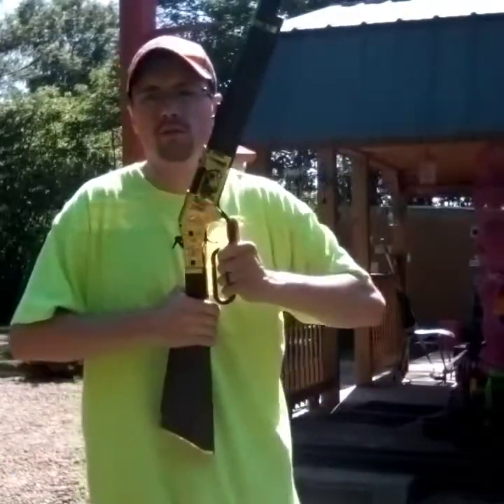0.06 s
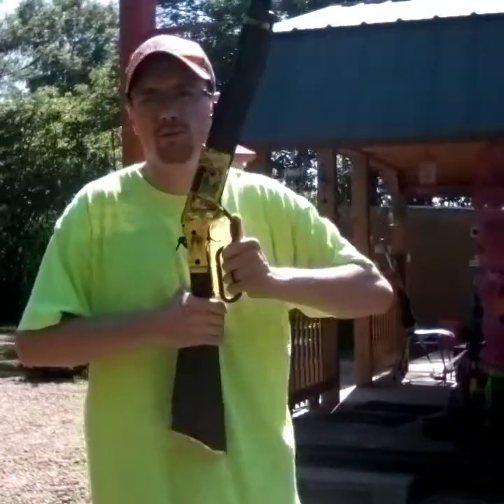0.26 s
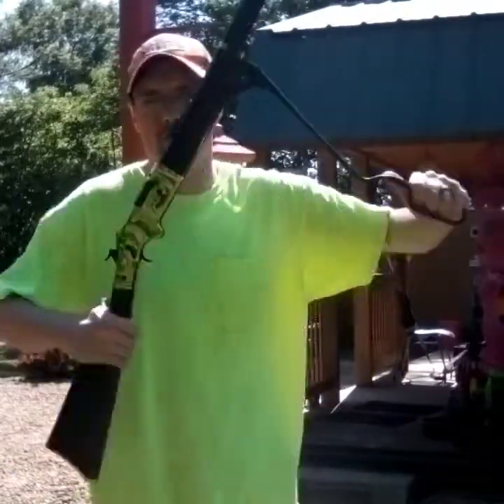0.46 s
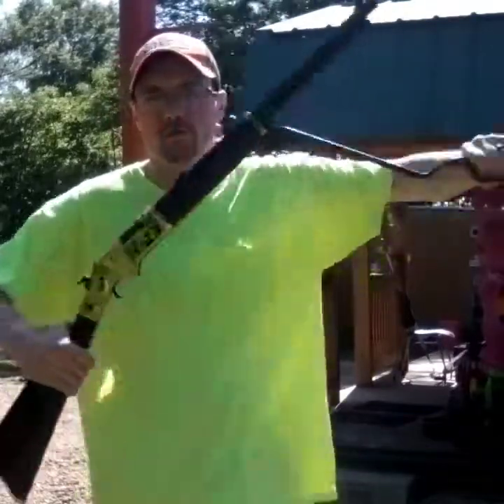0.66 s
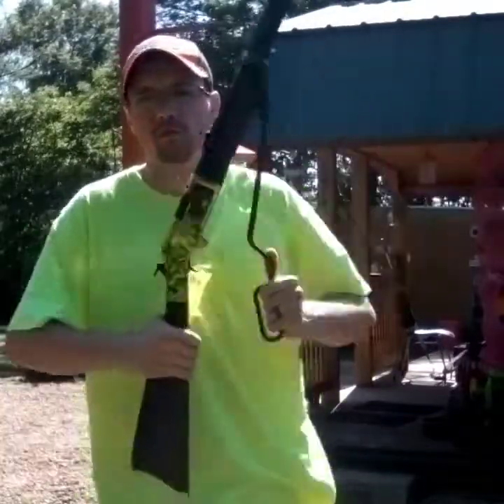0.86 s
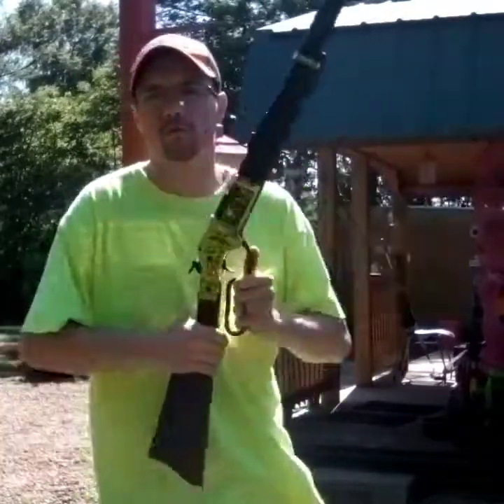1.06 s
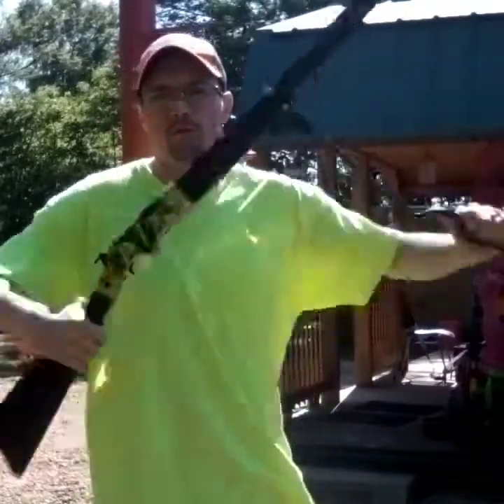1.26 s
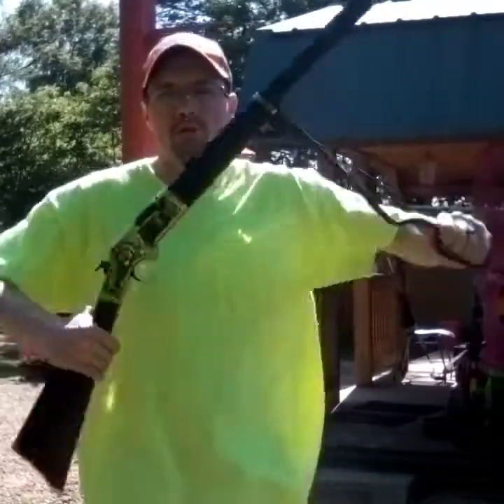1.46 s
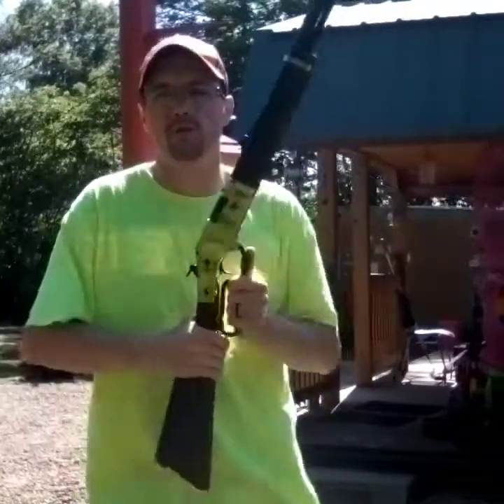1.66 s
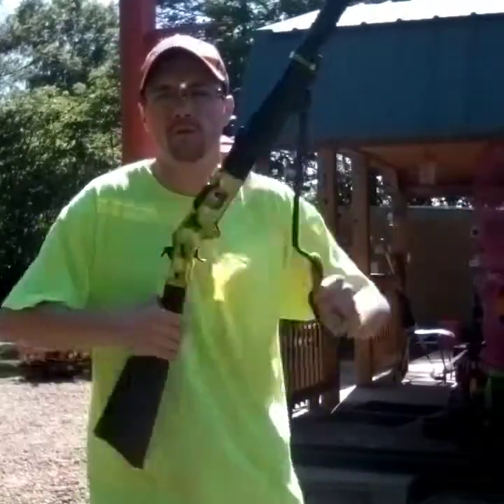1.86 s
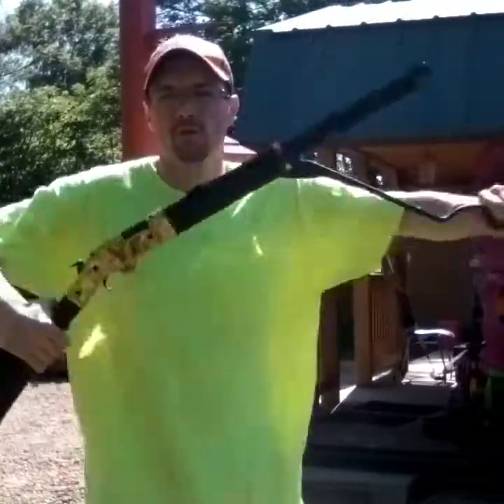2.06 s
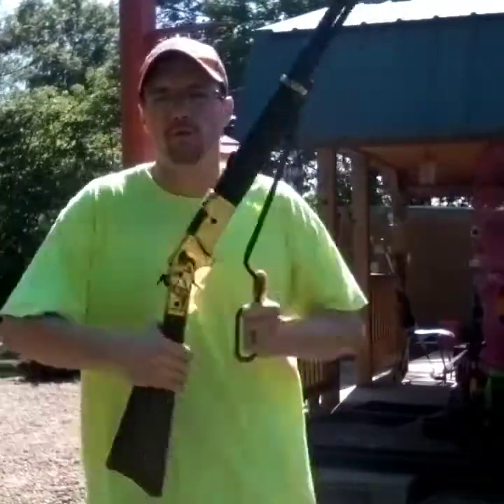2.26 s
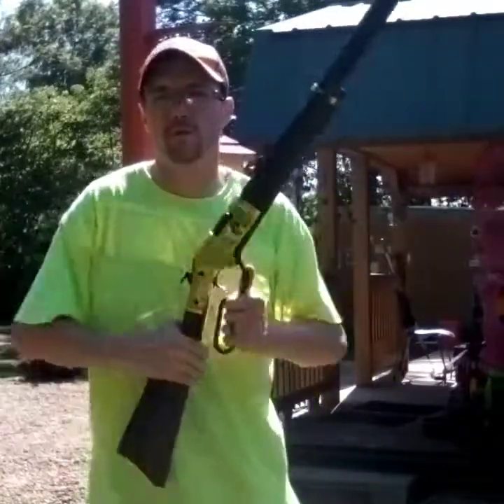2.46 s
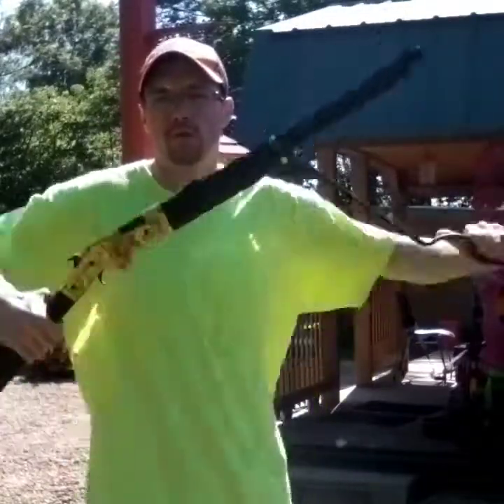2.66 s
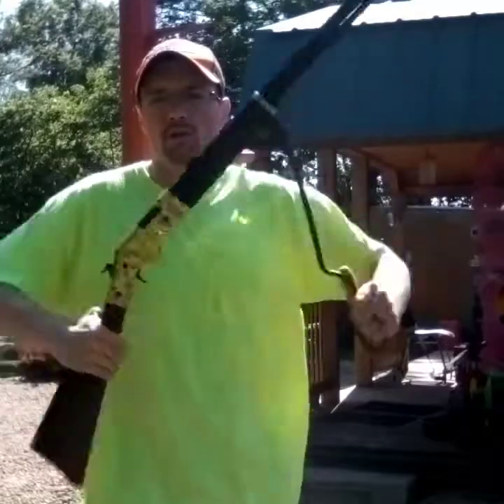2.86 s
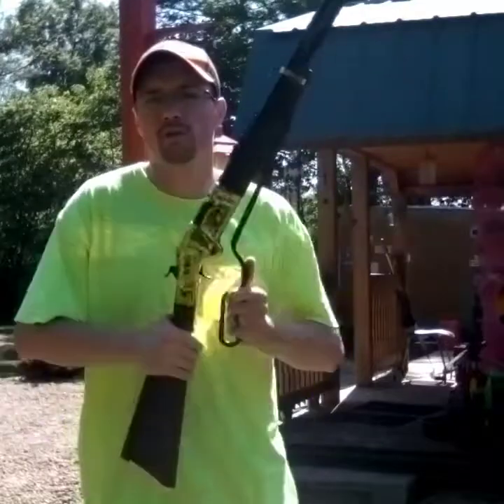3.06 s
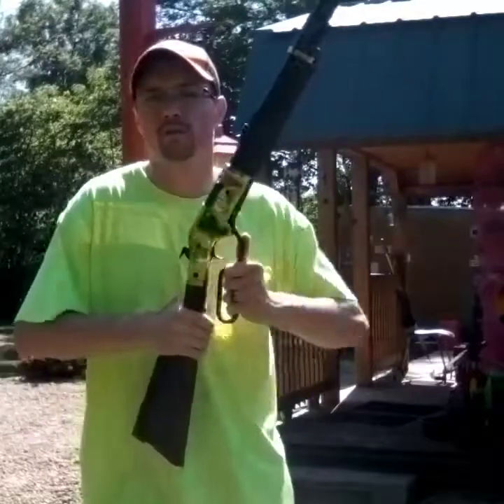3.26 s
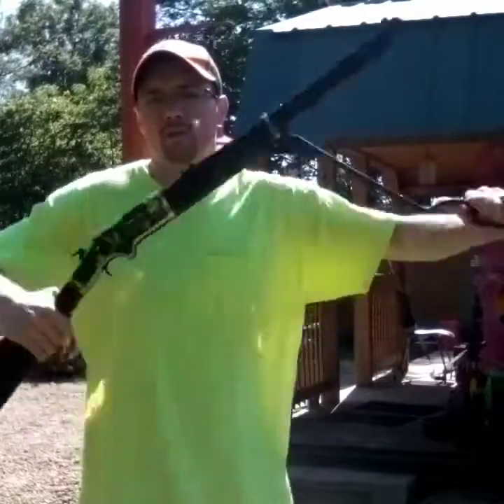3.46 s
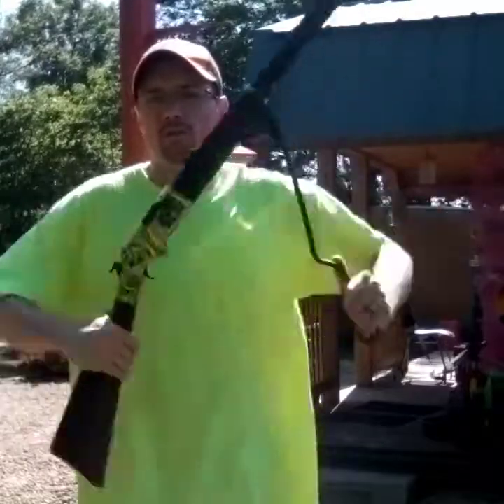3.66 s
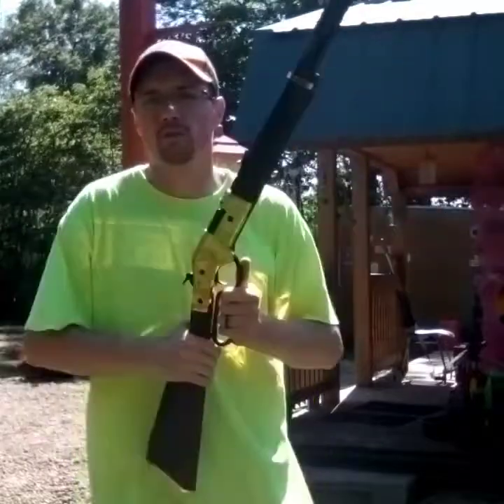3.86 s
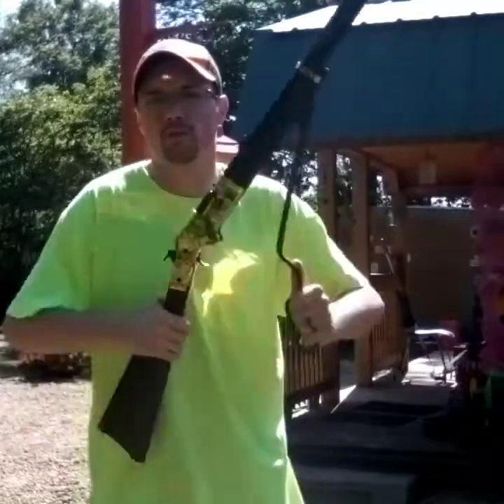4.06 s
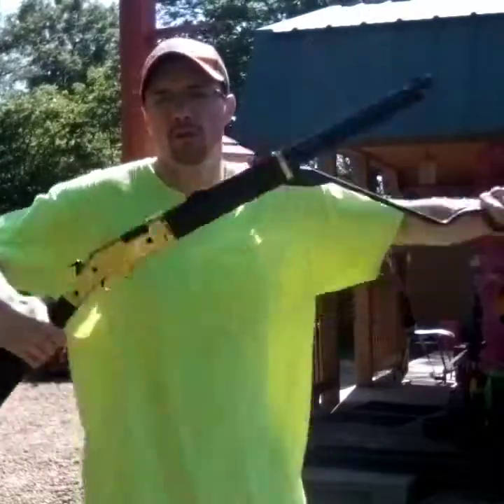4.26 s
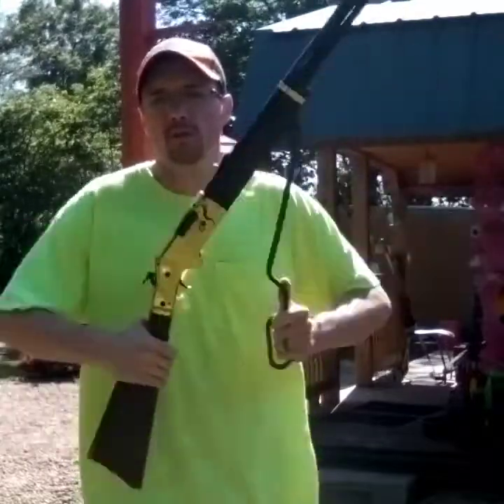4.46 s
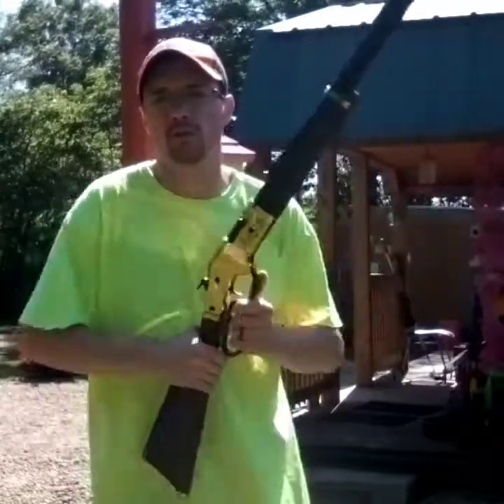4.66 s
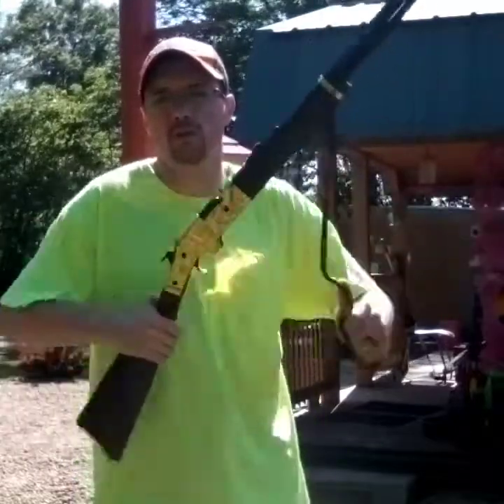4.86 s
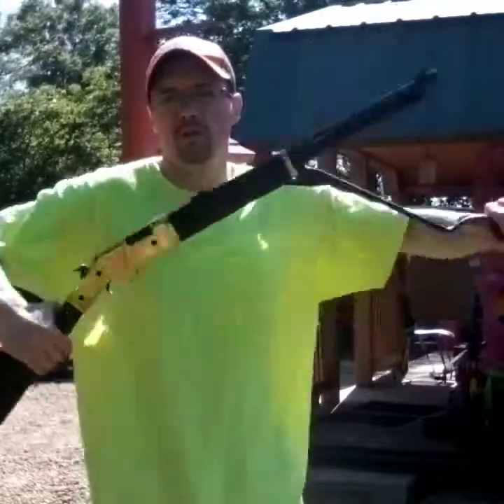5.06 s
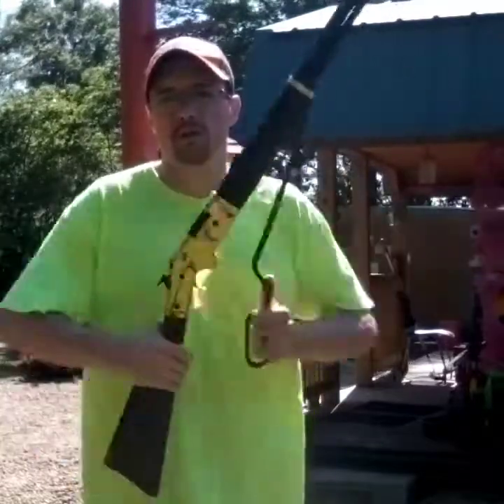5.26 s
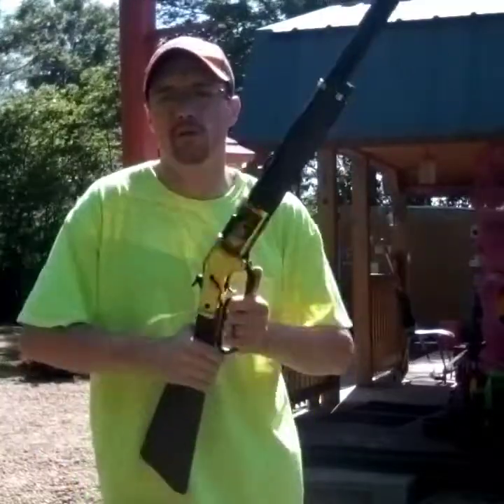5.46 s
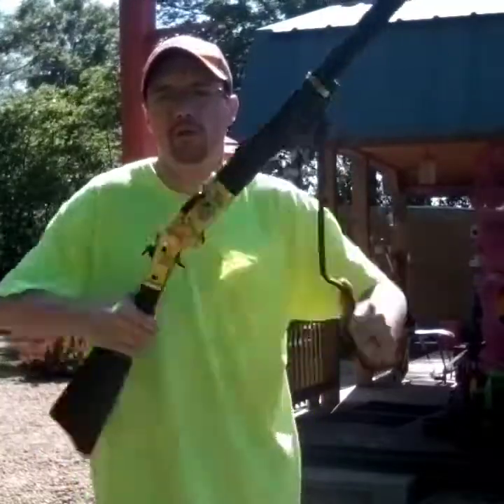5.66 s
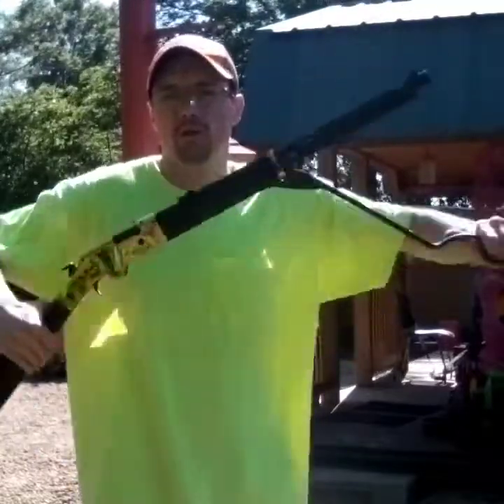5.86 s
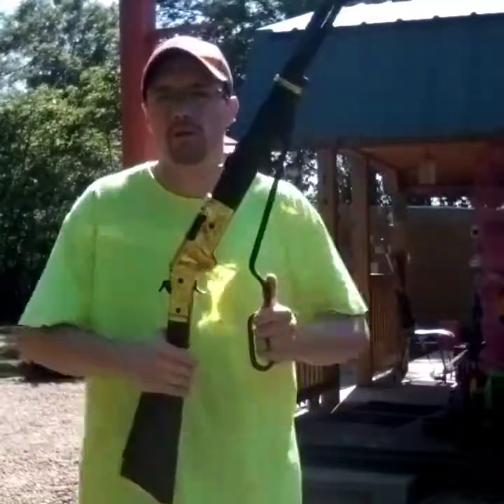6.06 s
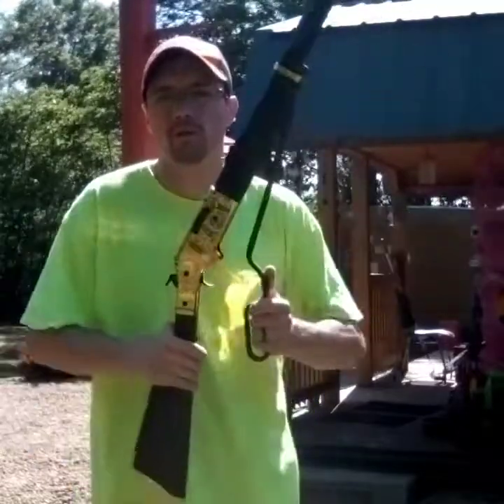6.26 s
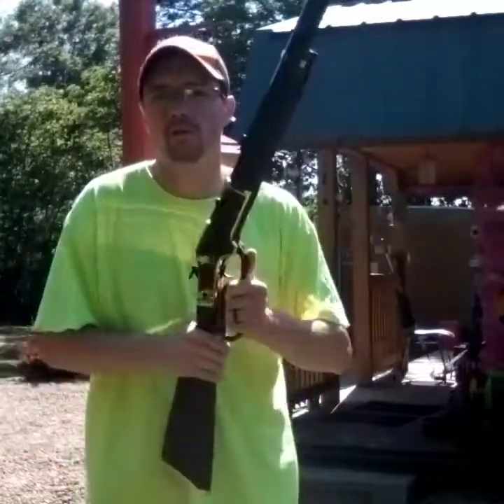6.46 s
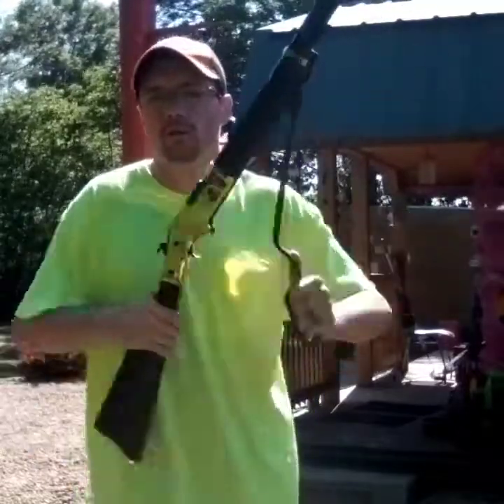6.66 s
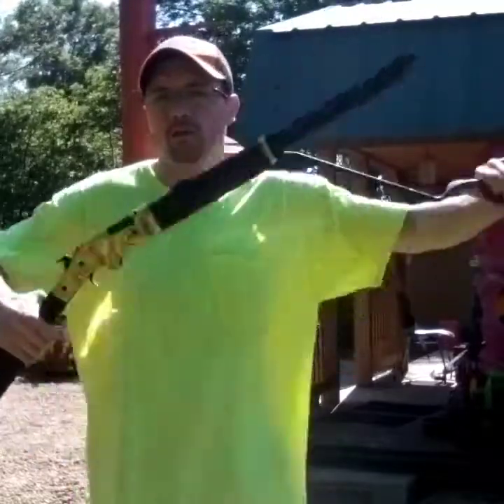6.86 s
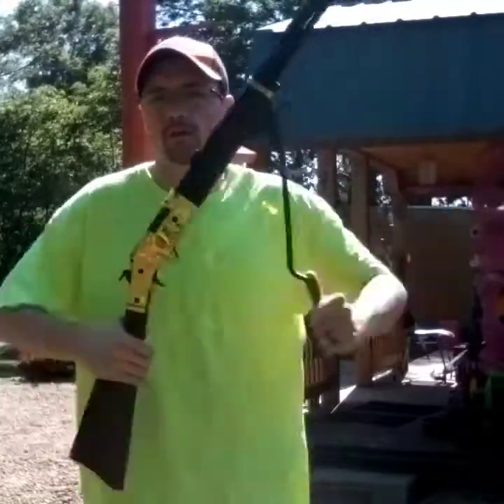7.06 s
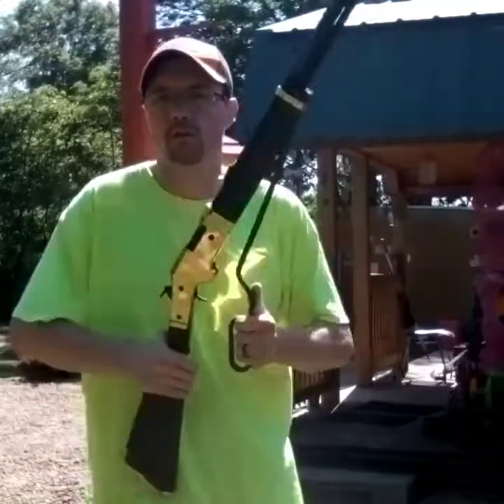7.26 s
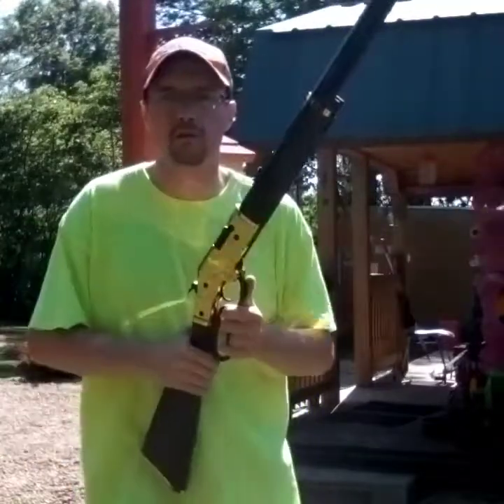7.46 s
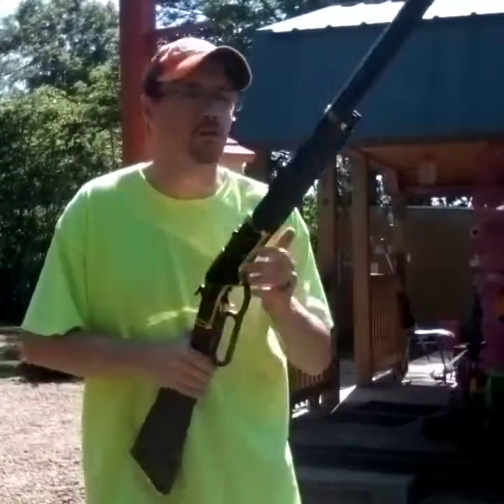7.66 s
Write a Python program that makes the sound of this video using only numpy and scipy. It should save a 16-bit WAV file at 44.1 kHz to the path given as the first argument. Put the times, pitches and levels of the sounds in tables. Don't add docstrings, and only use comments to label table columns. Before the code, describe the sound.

After a thin dry pivot squeak, a rifle's pump lever is worked by hand at a steady pace, about every three quarters of a second. Light clicks, ticks and scrapes lead to each hard, clipped-sounding metal slam, nine in all, some softer or doubled. Outdoors, heard close, with short yard echoes, low engine and fan hum, faint traffic and a far vehicle gradually getting louder.

```python
import sys
import numpy as np
from scipy import signal
from scipy.fft import rfft, irfft, next_fast_len
from scipy.io import wavfile
from scipy.ndimage import uniform_filter1d, minimum_filter1d, map_coordinates

SR = 44100
rng = np.random.default_rng(int(sys.argv[2]) if len(sys.argv) > 2 else 0)


def materialize(psi):
    bounded = np.clip(np.atleast_2d(psi).T, -1, 1)
    quanta = np.round(bounded * 32767).astype(np.int16)
    wavfile.write(sys.argv[1], SR, quanta)


def invert_db(level):
    return 10 ** (np.asarray(level, dtype=float) / 20)


N = 340011

# blow in seconds, level in dB, rattle length in s, lead of the catch in s, catch in dB.
SLAMS = [
    (0.993, -2, 0.0048, 0.0057, -9),
    (1.705, -2.5, 0.0054, 0.006, -13.5),
    (2.3758, -6.5, 0.0014, 0.0056, -16),
    (3.1678, -8, 0.0042, 0.0058, -9),
    (3.8951, -5.5, 0.0049, 0.0079, -7.5),
    (4.6467, -3.5, 0.0063, 0.006, -18),
    (5.458, -2.5, .0055, .0056, -8),
    (6.42, -4, 0.0071, 0.0086, -13),
    (7.3905, -7.5, 0.003, 0.0014, -5.5),
]
# start in seconds, peak in dB, rebound after in s, rebound in dB, drag in dB.
STOPS = [(0.628, -25.5, 0.012, -29.5, -51), (1.384, -18.5, 0.01, -30, -51), (2.08, -20.5, 0.013, -29, -51),
         (2.7501, -18.5, 0.0165, -31.5, -50), (3.5532, -19, 0.012, -26.5, -46.5),
         (4.29, -19, 0.013, -24.5, -49), (5.0705, -19, .0372, -34, -55), (5.8618, -21, 0.016, -28.5, -59),
         (6.9012, -27, 0.033, -33, -51.5)]
# start in seconds, peak in dB, tube ring in dB, drag in dB.
RETURNS = [(0.897, -30, -9.5, -62.5), (1.614, -30, -5.5, -53), (2.291, -25, -10, -53),
           (2.9677, -24.5, -11, -56), (3.762, -24, -10, -57), (4.5188, -25.5, -6, -55),
           (5.2924, -24, -10, -52.5), (6.0767, -25, -10, -56), (7.144, -28, -7.5, -49.5)]
# frequency in Hz, level in dB per Hz.
GRIT = [(590, -45), (1000, -15.5), (1660, -6), (2790, -10), (3980, -3), (4540, -5.5), (6120, -2),
        (8900, -31), (14000, -44.5)]
# time in seconds, pitch in Hz, level in dB.
PASSER = [
    (0, 74, -64),
    (2.5, 77, -63),
    (4, 81.7, -59.5),
    (6, 83.5, -53),
    (6.3, 73.9, -50.5),
    (7.7, 74.1, -48),
]


def unit(x):
    return x / np.sqrt(np.mean(x ** 2) + 1e-20)


def along(points, hz):
    f, v = np.transpose(points)
    return np.interp(np.log(hz + 1), np.log(f + 1), v)


def curves(rows):
    s, *cols = np.transpose(rows)
    return [np.interp(np.arange(N) / SR, s, c) for c in cols]


def wobble(rate):
    knots = rng.standard_normal(int(N * rate / SR) + 4)
    return map_coordinates(knots, [np.arange(N) * rate / SR])


def causal(gain, size=2048):
    cep = irfft(np.log(gain(np.fft.rfftfreq(size, 1 / SR)) + 1e-6), size)
    cep[1:size // 2] *= 2
    cep[size // 2 + 1:] = 0
    h = irfft(np.exp(rfft(cep)), size)
    return h / np.linalg.norm(h)


def add(track, s, sound):
    part = track[round(s * SR):][:len(sound)]
    part += sound[:len(part)]


def split(x, edge_hz):
    m = next_fast_len(N)
    low = irfft(rfft(x, m) / (1 + (np.fft.rfftfreq(m, 1 / SR) / edge_hz) ** 6), m)[..., :N]
    return low, x - low


def rush(spectrum, patchy_db):
    z = signal.stft(rng.standard_normal(N + 512), nperseg=512)[2]
    field = uniform_filter1d(rng.standard_normal(z.shape), size=4, axis=0)
    field = uniform_filter1d(field, size=9, axis=1)
    x = signal.istft(z * invert_db(patchy_db * unit(field)), nperseg=512)[1][:N]
    m = next_fast_len(N + 8192)
    colour = invert_db(along(spectrum, np.fft.rfftfreq(m, 1 / SR)))
    return unit(irfft(rfft(x, m) * colour, m)[:N])


def grainy(spectrum, rate, spread_db):
    grains = rng.standard_normal(N) * invert_db(spread_db * wobble(rate))
    return unit(signal.fftconvolve(grains, causal(lambda f: invert_db(along(spectrum, f))))[:N])


def background():
    # time in seconds, strength in dB.
    gusts = [(0, -1.5), (.9, 0), (2.0, 1), (2.9, -1), (4.0, 1.9), (5.5, 1.5), (6.4, 2.3), (7.0, 4),
             (7.71, 1.2)]
    # frequency in Hz, level in dB per Hz.
    rumble_colour = [(14, -48.5), (25, -31.5), (40, -18), (60, -13.5), (100, -1), (140, -3.5), (200, -12),
                     (250, -22.5), (350, -27.5), (480, -49.5), (800, -110)]
    # frequency in Hz, level in dB per Hz.
    traffic_colour = [(190, -61.5), (330, -15), (365, -21.5), (510, -0.5), (563, 2.5), (789, -11),
                      (870, -28.5), (1000, -27.5), (1300, -42.5), (2200, -120)]
    # frequency in Hz, level in dB per Hz.
    hiss_colour = [(530, -40), (900, -7.5), (968, -4), (1710, -9.5), (1930, -9.5), (3580, -13.5),
                   (4040, -15.5), (4570, -15), (5480, -10), (9220, -35), (15000, -38), (16300, -33.5)]
    breeze_db, = curves(gusts)
    near_db = curves(PASSER)[1]
    vehicle_share, breeze_share = 0.3, 0.36
    rumble_db = -48 + vehicle_share * (near_db - near_db.mean()) + 0.84 * wobble(0.71)
    rumble = invert_db(rumble_db) * rush(rumble_colour, patchy_db=-1.0)
    traffic_db = -52 + breeze_share * breeze_db + 0.29 * wobble(6.4) + 0.4 * wobble(0.96)
    traffic = invert_db(traffic_db) * rush(traffic_colour, patchy_db=3.0)
    return rumble + traffic + invert_db(-64.5 + breeze_db) * rush(hiss_colour, patchy_db=2.4)


def engines():
    # time in seconds, pitch in Hz, level in dB.
    drone = [(0.0, 102.73, -49.0), (0.77, 101.51, -44.6), (1.54, 101.49, -40.2), (2.31, 101.62, -41.8),
             (3.08, 101.81, -50.6), (3.85, 101.32, -53.8), (4.62, 99.96, -46.7), (5.39, 99.45, -43.6),
             (6.16, 99.65, -39.7), (6.93, 100.08, -41.2), (7.7, 100.09, -44.8)]
    # multiple of the pitch, level in dB.
    orders = [(.5, -59), (1.25, -59), (1.5, -61), (1.75, -60), (2, -61)]
    # time in seconds, pitch in Hz, level in dB.
    fan = [(0.0, 108.72, -54.5), (1.54, 108.77, -50.0), (3.08, 108.7, -50.1), (4.62, 108.76, -50.8),
           (6.16, 108.77, -48.9), (7.7, 108.84, -46.5)]
    # pitch in Hz, level in dB.
    hum_hz, hum_db = (58.2, -53.5)
    turn = lambda hz: 2 * np.pi * np.cumsum(hz) / SR
    hz, db = curves(drone)
    out = invert_db(db + 4.5 + 0.7 * wobble(10)) * np.cos(turn(hz))
    for multiple, order_db in orders:
        out += invert_db(order_db + 3 * wobble(1.5)) * np.cos(multiple * turn(hz) + 1.5 * wobble(3))
    hz, db = curves(fan)
    out += invert_db(db + 2.5) * np.cos(turn(hz))
    hz, db = curves(PASSER)
    vehicle_level = invert_db(db + 2.5 * wobble(2.5))
    out += vehicle_level * (np.cos(turn(hz)) + 0.8 * np.cos(2 * turn(hz) + wobble(2.5)))
    return out + invert_db(hum_db + 3 + 0.6 * wobble(3)) * np.cos(turn(np.full(N, hum_hz)))


def whines():
    # start in seconds, length in s, pitch in Hz, level in dB.
    squeals = [(.0, 0.066, 5700, -65.5), (1.598, 0.053, 3910, -55), (2.26, 0.049, 5440, -55.5),
               (2.823, 0.074, 6300, -68), (0.557, 0.079, 6400, -67), (0.41, .04, 5300, -64),
               (2.634, 0.046, 4000, -58), (3.48, .03, 6050, -56), (3.85, 0.035, 5700, -64.5),
               (4.091, 0.12, 2240, -60), (4.33, .12, 5470, -71), (4.54, 0.054, 3360, -72),
               (5.79, 0.017, 7200, -52), (5.92, 0.14, 3960, -65.5), (6.092, 0.079, 5860, -60),
               (6.776, 0.049, 5900, -55), (6.955, 0.036, 4270, -59), (6.12, .04, 3300, -65),
               (7.191, 0.055, 2080, -66.5), (7.288, 0.054, 5870, -62)]
    out = np.zeros(N)
    for s, length, hz, db in squeals:
        t = np.arange(round(length * SR)) / SR
        flutter = uniform_filter1d(rng.standard_normal((2, SR // 4)), size=150)[:, :len(t)]
        band = flutter[0] * np.cos(2 * np.pi * hz * t) + flutter[1] * np.sin(2 * np.pi * hz * t)
        add(out, s, invert_db(db) * unit(band) * np.sqrt(np.hanning(len(t))))
    return out


def squeak():
    # time in seconds, level in dB.
    swell = [
        (0.115, -74),
        (0.135, -61.5),
        (0.256, -61),
        (0.33, -65),
        (0.375, -69),
    ]
    # frequency in Hz, level in dB.
    partials = [(6293, 0), (3321, -12), (8861, -27)]
    t = np.arange(N) / SR
    on = (t > swell[0][0]) & (t < swell[-1][0])
    tone = np.zeros(N)
    for hz, db in partials:
        tone += invert_db(db + 4.5 * wobble(35)) * np.sin(2 * np.pi * hz * t + 0.9 * wobble(70))
    return on * invert_db(curves(swell)[0] + 3.5) * tone


def knocks():
    # start in seconds, peak in dB, tube ring in dB.
    unlatch = [(0.461, -34.5, 2.5), (1.2426, -30.5, -18), (1.9503, -33, -2), (2.623, -28, -8.5),
               (3.4286, -31.5, -0.5), (4.167, -30.5, -3.5), (4.948, -33.5, 1), (5.7385, -36.5, 1.5),
               (6.769, -34, 0)]
    # start in seconds, peak in dB, tube ring in dB, bright edge in dB.
    strays = [(0.3592, -36.5, -12, -17), (0.438, -30, -17, -5.5), (1.921, -41, -7, -21),
              (2.3393, -34, -3, -10), (2.59, -38.5, 0, -2), (3.2696, -35.5, -12, -5),
              (3.318, -34, -17, -21), (4.18, -42, -20, -18), (2.783, -38, -20, -6), (2.821, -46, -32, -3),
              (5.627, -33, -11, -22), (1.855, -35, -8, -20), (5.694, -43, -17, -10),
              (6.6505, -36, -28, -19), (6.721, -30.5, -36, -5.5)]
    events = [(*row, -20) for row in unlatch]
    events += [(*row[:3], -20) for row in RETURNS]
    events += [(s, db, -12, -12) for s, db, *_ in STOPS]
    events += [(s + after, db, -28, -8.5) for s, _, after, db, _ in STOPS]
    return events + strays


def clicks():
    # pitch in Hz, time to silence in s, swell in s.
    tube_hz, tube_t60, swell_s = (1335, .021, .002)
    # frequency in Hz, t60 in s, level in dB.
    links = [(903, 0.044, -14), (1710, 0.037, -5), (1540, 0.016, -6), (2240, 0.014, -3), (3330, 0.029, -10),
             (4000, 0.012, -2), (4600, 0.0077, -7.5), (4960, .02, -7.5), (5950, 0.014, -4),
             (7200, 0.046, -16)]
    # frequency in Hz, level in dB per Hz.
    snap = [(470, -48), (800, -23), (1340, -0.5), (1720, -8.5), (2070, -3), (5310, -11), (5940, -10),
            (10300, -35.5), (14800, -38), (16000, -39)]
    dull, bright, rings = np.zeros((3, N))
    t = np.arange(SR // 20) / SR
    swell = (1 - np.exp(-t / 0.0008)) ** 2
    for s, db, tube_db, edge_db in knocks():
        fade = invert_db(db - 60 * t / 0.031) * (1 - np.exp(-t / 0.0012))
        add(dull, s, invert_db(-8) * fade * rng.standard_normal(len(t)))
        add(bright, s, invert_db(edge_db - 3.0) * fade * rng.standard_normal(len(t)))
        tube_level = invert_db(db + tube_db + 4 - 60 * (t / tube_t60) ** 2) * (1 - np.exp(-t / swell_s)) ** 2
        tube_phase = 2 * np.pi * tube_hz * rng.normal(1, 0.017) * t
        waver = uniform_filter1d(np.cumsum(rng.normal(0, 0.075, len(t))), size=40)
        add(rings, s, tube_level * np.sin(tube_phase + waver))
        for hz, t60, link_db in links:
            size_db = db - 8 + link_db + rng.normal(0, 4.9)
            size_db += (edge_db + 10.5) * np.clip(hz / 2500 - 1, 0, 1)
            size_db += (hz < 1000) * (db + 30) * 0.5
            ring = np.sin(2 * np.pi * hz * rng.normal(1, 0.03) * t)
            add(rings, s, invert_db(size_db - 60 * t / t60) * np.sqrt(swell) * ring)
    low = causal(lambda f: invert_db(along(snap, f)) / np.hypot(1, (f / 3300) ** 4))
    high = causal(lambda f: invert_db(along(snap, f)) / np.hypot(1, (4600 / (f + 1)) ** 4))
    return rings + signal.fftconvolve(dull, low)[:N] + signal.fftconvolve(bright, high)[:N]


def drags():
    # start in seconds, length in s, level in dB.
    free = [(0.498, 0.036, -60), (.943, .0087, -66), (0.362, .03, -63), (.468, .02, -56), (2.597, .02, -53),
            (1.252, 0.087, -60), (1.996, 0.063, -54), (2.517, 0.03, -49), (2.68, 0.075, -51.5),
            (2.817, 0.0092, -65), (3.362, .023, -70), (3.479, 0.034, -51), (3.523, 0.0099, -53),
            (3.886, .0069, -40), (4.225, 0.058, -46.5), (5.016, 0.042, -54.5), (5.443, .009, -53),
            (5.796, 0.069, -60), (6.061, 0.024, -53.5), (6.816, 0.02, -52), (7.369, .006, -48)]
    after_stops = [(row[0] + 0.0103, 0.022, row[-1]) for row in STOPS]
    after_returns = [(row[0] + 0.0087, 0.028, row[-1]) for row in RETURNS]
    return after_stops + after_returns + free


def scrapes():
    level = np.zeros(N)
    for s, length, db in drags():
        t = np.arange(round((length + 0.04) * SR)) / SR
        fade_db = db + 2.5 - 220 * t - 60 * np.maximum(t - length, 0) / 0.05
        add(level, s, invert_db(fade_db) * (1 - np.exp(-t / 0.0015)))
    return level * invert_db(2.2 * wobble(90) - 0.6) * grainy(GRIT, rate=420, spread_db=3.5)


def ticks():
    # start in seconds, peak in dB, pitch in Hz.
    pin_ticks = [(.4389, -33, 4990), (.452, -42, 2100), (.5044, -48, 4040), (.506, -45, 7250),
                 (1.3048, -36, 5950), (1.306, -44, 4000), (2.1138, -39, 3900), (2.34, -45, 3100),
                 (2.735, -48, 4100), (2.742, -44, 6100), (3.3952, -46, 4760), (4.4697, -43, 4040),
                 (4.532, -47, 4900), (4.9736, -49, 6705), (5.286, -47, 5200), (5.4061, -48, 4860),
                 (5.7938, -29, 5930), (5.8243, -37, 6050), (6.0682, -42, 2800), (6.723, -38, 2200),
                 (6.724, -40, 3100), (6.822, -39, 7040), (6.935, -40, 4050), (7.1207, -42, 4100),
                 (7.1667, -41, 3460)]
    # start in seconds, peak in dB, pitch in Hz, t60 in s.
    thuds = [
        (.366, -33, 560, .1),
        (1.149, -28, 557, .11),
        (3.323, -29, 566, .1),
    ]
    # start in seconds, peak in dB, pitch in Hz, t60 in s.
    springs = [
        (4.652, -49, 12400, .18),
        (5.46, -46, 12400, .2),
        (4.328, -45, 8000, .025),
        (5.108, -41, 8000, .025),
        (6.935, -45, 7800, .025),
    ]
    out, t = np.zeros(N), np.arange(SR // 6) / SR
    pin_t60 = 0.026
    for s, db, hz, t60 in [(*tick, pin_t60) for tick in pin_ticks] + thuds + springs:
        waver = uniform_filter1d(np.cumsum(rng.normal(0, 0.026, len(t))), size=30)
        ring = np.sin(2 * np.pi * hz * t + waver * np.sqrt(hz / 6000))
        add(out, s, invert_db(db - 2.0 - 60 * t / t60) * ring * (1 - np.exp(-t / 0.00095)) ** 2)
    return out


def rattles():
    # start in seconds, peak in dB.
    pin_hits = [(0.46, -41), (0.5006, -49), (0.5063, -42), (0.9453, -57), (1.3108, -37), (1.6394, -44),
                (1.661, -43), (1.8094, -32.5), (1.9974, -54), (2.0118, -42), (2.018, -38), (2.0343, -37),
                (2.3114, -46), (2.5406, -38), (2.5533, -34), (2.6024, -42), (2.68, -40), (2.6998, -42),
                (2.726, -38), (2.82, -47.5), (3.3662, -47), (3.3744, -51), (3.4715, -48), (3.489, -40),
                (3.5186, -34.5), (3.581, -35.5), (3.738, -52), (3.7824, -50), (4.229, -43), (4.2348, -39),
                (4.2522, -36), (4.2614, -49), (4.3164, -39), (4.3274, -40.5), (4.4707, -47.5),
                (4.9915, -47), (5.011, -39), (5.021, -37), (5.0877, -39.5), (5.3114, -42.5), (5.357, -50),
                (6.0682, -40), (6.8212, -44), (6.8293, -39.5), (7.1207, -49), (7.1656, -48.5),
                (7.1822, -45)]
    # frequency in Hz, t60 in s, level in dB.
    pin_modes = [(3200, .02, -12), (4140, .025, -7.5), (5000, .018, -8.5), (6050, 0.025, -1.5),
                 (6700, 0.018, -7.5), (7200, .02, -10.5)]
    out, snaps, t = np.zeros(N), np.zeros(N), np.arange(SR // 20) / SR
    for s, db in pin_hits:
        add(snaps, s, invert_db(db - 12 - 60 * t / 0.035) * rng.standard_normal(len(t)))
        for hz, t60, mode_db in pin_modes:
            waver = np.cumsum(rng.normal(0, 0.07, len(t)))
            peak_db = db - 4.0 + mode_db + rng.normal(0, 5.0)
            level = invert_db(peak_db - 60 * t / t60) * (1 - np.exp(-t / 0.0007))
            add(out, s, level * np.sin(2 * np.pi * hz * rng.normal(1, 0.015) * t + waver))
    return out + signal.fftconvolve(snaps, causal(lambda f: invert_db(along(GRIT, f))))[:N]


def contacts():
    # start in seconds, level in dB, rattle length in s.
    stumbles = [(1.6955, -14.5, 0.00072), (1.732, -24, 0.0054), (2.361, -28, 0.013), (2.378, -18, 0.005),
                (2.3827, -16.5, 0.0081), (2.405, -29, 0.00075), (2.408, -23, 0.0018),
                (2.418, -32.5, 0.0015), (2.435, -29.5, 0.0035), (2.45, -33, 0.0032), (3.1551, -30, .004),
                (3.1755, -8, 0.0038), (3.181, -16, 0.003), (3.19, -18.5, 0.0012), (3.88, -31.5, .003),
                (4.646, -14, 0.0013), (5.451, -15.5, 0.0013), (7.375, -27, .0044), (7.377, -17, 0.0058)]
    rows = []
    for s, db, hold, lead, catch_db in SLAMS:
        rows += [(s - lead - 0.0027, catch_db - 10.5, 0.003),
                 (s - lead, catch_db, 0.49 * lead),
                 (s, db, hold),
                 (s + hold + 0.0019, db - 15, 0.005)]
    return rows + stumbles


def slams():
    # frequency in Hz, width in Hz, level in dB.
    action = [(1310, 96, -5.5), (2240, 170, -2.5), (3450, 67, 1.5), (4170, 80, -10), (4770, 92, -12),
              (5520, 67, -13.5), (6350, 99, -1)]
    # frequency in Hz, level in dB per Hz.
    blow_colour = [(215, -52.5), (330, -17.5), (552, -15), (760, -6), (1270, -4.5), (1600, -5.5),
                   (2330, -4), (3200, -9), (5450, -6.5), (6800, -11), (9000, -24), (13000, -34),
                   (14900, -22.5), (15800, -29)]
    # body in dB, edge in dB, thump in dB.
    grip = [(-0.2, -0.55, -6.5), (-1.5, 0.1, 1), (4.5, 4.5, 10), (-0.5, -1.9, 3), (3.5, 2.5, 1.5),
            (-0.4, 0.5, -1), (0.5, 0.5, 2.5), (-3.5, -0.5, -5.5), (1.5, 2.1, 3.5)]
    hits, t = np.zeros(N), np.arange(SR // 20) / SR
    for s, db, hold in contacts():
        strengths_db = 2.5 * rng.standard_normal(len(t) // 21).repeat(21)
        impacts = rng.standard_normal(len(t)) * invert_db(strengths_db)
        impacts /= np.std(impacts[:round((hold + 0.002) * SR)])
        impacts *= (1 + 0.5 * np.exp(-t / 0.0012)) * (1 - np.exp(-t / 0.0004))
        add(hits, s, impacts * invert_db(db - 3.0 - 60 * np.maximum(t - hold, 0) / 0.015))
    modes = lambda f: 0.67 + sum(invert_db(db) * w / np.hypot(w, f - c) for c, w, db in action)
    low_cut = lambda f: np.hypot(1, (420 / (f + 1)) ** 4)
    receiver = causal(lambda f: invert_db(along(blow_colour, f)) * modes(f) / low_cut(f))
    sound = signal.fftconvolve(hits, receiver)[:N]
    body, rest = split(sound, edge_hz=1700)
    middle, edge = split(rest, edge_hz=2100)
    thump, body = split(body, edge_hz=420)
    body_db, edge_db, thump_db = np.transpose(grip)
    starts = np.transpose(SLAMS)[0] - 0.03
    stroke = np.maximum(np.searchsorted(starts, np.arange(N) / SR) - 1, 0)
    body = invert_db(body_db[stroke]) * (body + invert_db(thump_db[stroke]) * thump)
    return body + middle + invert_db(edge_db[stroke]) * edge


def settling():
    # level in dB, hold in s, fade in dB per s.
    settle = [(-32.5, .012, 117.5), (-31, 0.01, 132.5), (-29, 0.029, 201), (-33, 0.0062, 216),
              (-30.5, 0.014, 135), (-30, 0.014, 119), (-31.5, 0.0075, 123.5), (-33, 0.02, 123.5),
              (-30.5, 0.0082, 168)]
    # frequency in Hz, level in dB per Hz.
    shot = [(250, -61), (450, -11), (870, -1.5), (1010, -5.5), (2300, -4.5), (3500, -3), (4830, -7),
            (6500, -6.5), (7800, -16.5), (10400, -26), (13000, -35.5), (14800, -24.5), (15800, -29.5)]
    # frequency in Hz, width in Hz, boost as a factor.
    tail_bands = [(1290, 130, 1.1), (2300, 200, 1.6), (4130, 120, 0.62), (4892, 230, 1), (5540, 110, 0.72),
                  (6300, 250, 1.2)]
    level, t = np.zeros(N), np.arange(N) / SR
    rise_s, end_db = 0.021, -57.5
    for (blow, *_), (db, hold, fade) in zip(SLAMS, settle):
        s = blow + np.cumsum([0, rise_s, hold, (db - end_db) / fade, 0.09])
        level += invert_db(np.interp(t, s, [-50, db, db, end_db, end_db - 3.0], -120, -120))
    mix = 0.6 * grainy(shot, rate=220, spread_db=3.5) + 0.75 * rush(shot, patchy_db=4.5)
    streaks = causal(lambda f: 1 + sum(boost * w ** 2 / (w ** 2 + (f - c) ** 2) for c, w, boost in tail_bands))
    low, treble = split(unit(signal.fftconvolve(mix, streaks)[:N]), edge_hz=8500)
    return level * (low + treble * np.minimum(level / invert_db(-39.0), 1.2) ** 1.1)


def yard(x, wet_db, gap):
    # frequency in Hz, t60 in s.
    decay = [(300, 0.25), (1000, 0.14), (3000, 0.3), (7000, 0.29), (16000, 0.079)]
    # delay in seconds, level in dB.
    walls = [
        (.029, -24),
        (.155, -41.5),
    ]
    out, step = np.zeros(N), SR // 40
    for i in range(0, N, step):
        hz, t, z = signal.stft(rng.standard_normal(SR // 5), SR, nperseg=256)
        tail = signal.istft(z * invert_db(-60 * t / along(decay, hz)[:, None]), SR, nperseg=256)[1]
        tail /= np.linalg.norm(tail)
        add(out, i / SR + gap, invert_db(wet_db) * signal.fftconvolve(x[i:i + step], tail))
    for delay, db in walls:
        add(out, delay, invert_db(db) * x)
    return out


def scene():
    blows = slams()
    linkage = clicks() + ticks() + rattles() + scrapes() + squeak() + whines()
    faint = invert_db(-3.5) * linkage
    echoes = yard(invert_db(-14.0) * blows + faint, wet_db=-11.5, gap=0.016)
    return (blows + linkage + echoes + settling() + engines() + background())[None]


def top_cut(x):
    return signal.sosfilt(signal.butter(12, 16640, fs=SR, output="sos"), x)


def record(dry):
    # frequency in Hz, level in dB per Hz.
    self_noise = [(9000, -11), (12500, -9.5), (14200, -3.5), (15000, -2), (15600, -0.5), (16000, -30)]
    low_pass = lambda x, hz: signal.sosfilt(signal.ellip(8, 0.5, 70, hz, fs=SR, output="sos"), x)
    fade_in = np.minimum(np.arange(N) / 100, 1)
    heard = low_pass(dry * fade_in + invert_db(-86.5) * rush(self_noise, patchy_db=1.0), 15750)
    needed = np.minimum(1, 0.95 / (np.abs(heard) + 1e-9))
    gain = uniform_filter1d(minimum_filter1d(needed, size=17), size=15)
    return top_cut(low_pass(heard * gain, 16050))


dry = scene()
out = record(dry)
materialize(out)
```